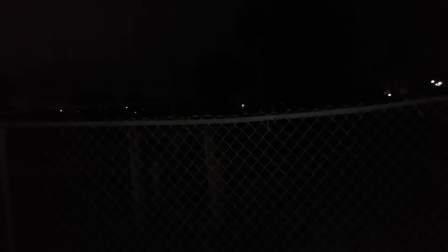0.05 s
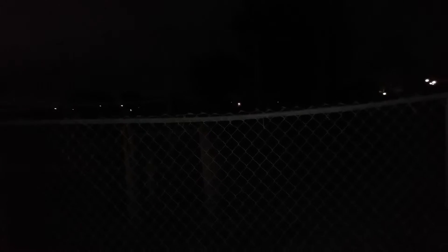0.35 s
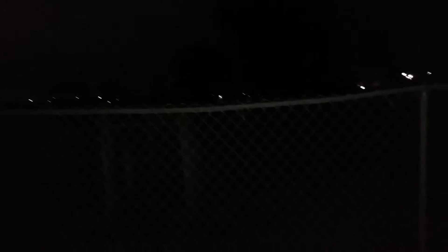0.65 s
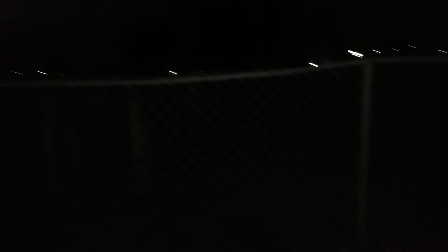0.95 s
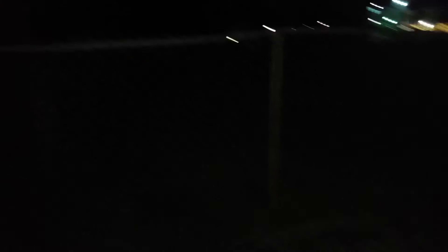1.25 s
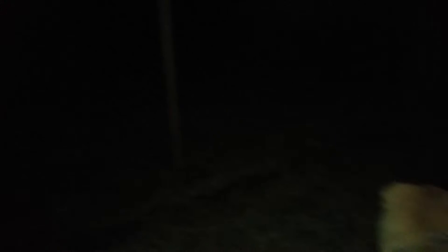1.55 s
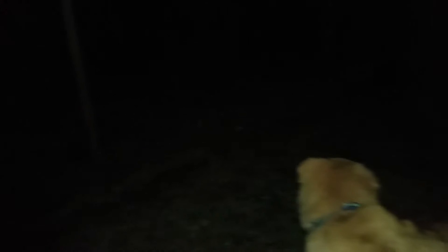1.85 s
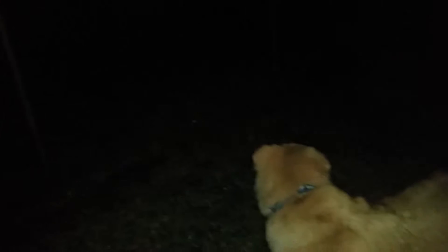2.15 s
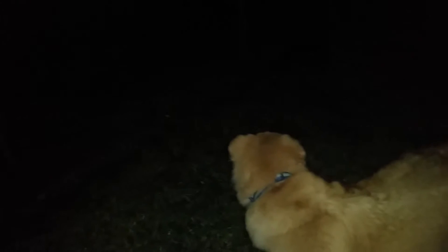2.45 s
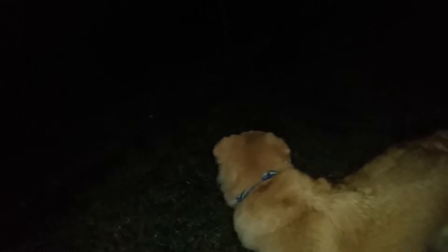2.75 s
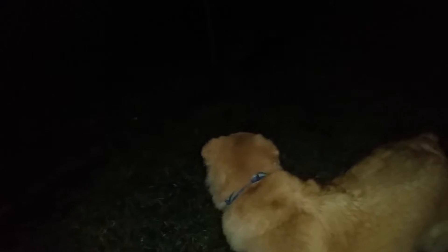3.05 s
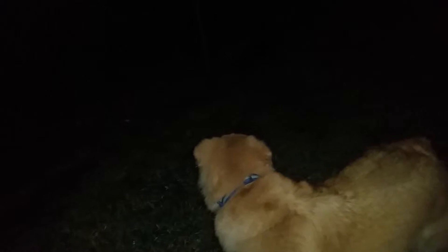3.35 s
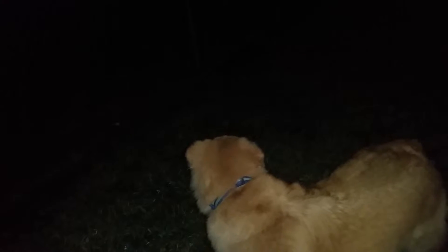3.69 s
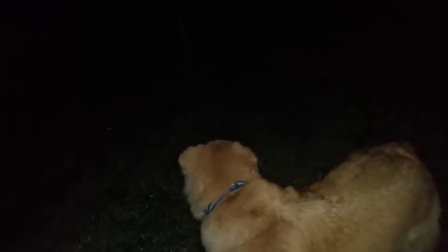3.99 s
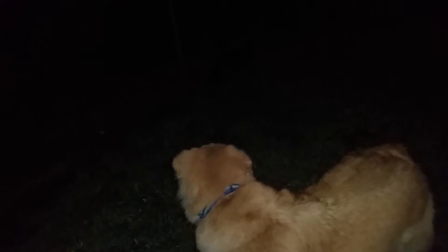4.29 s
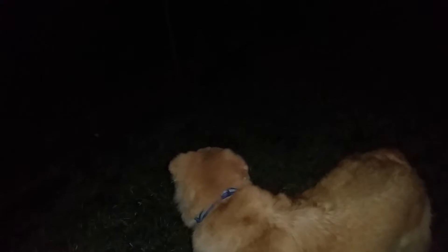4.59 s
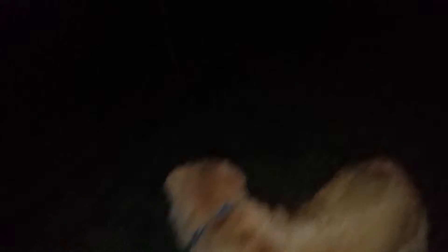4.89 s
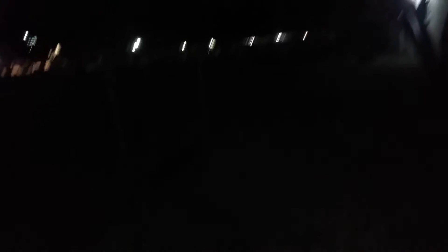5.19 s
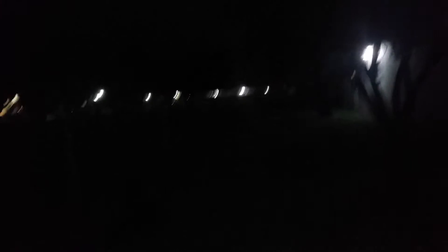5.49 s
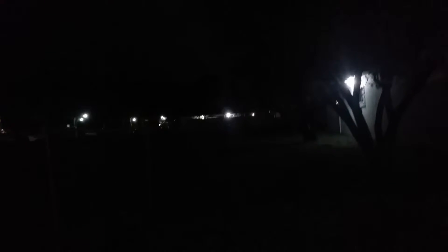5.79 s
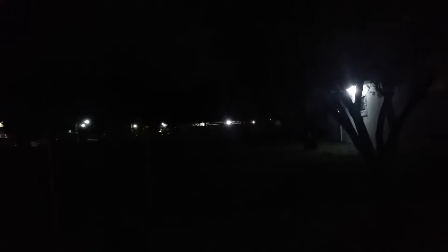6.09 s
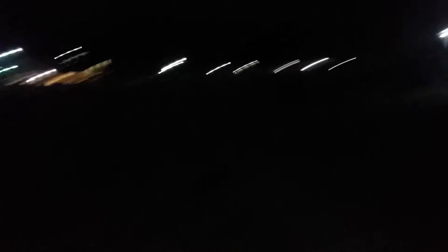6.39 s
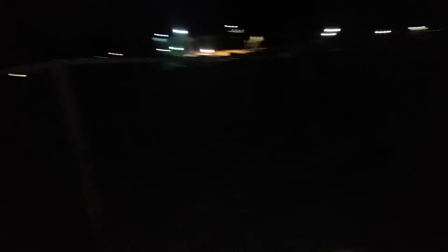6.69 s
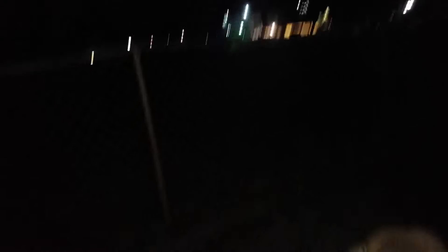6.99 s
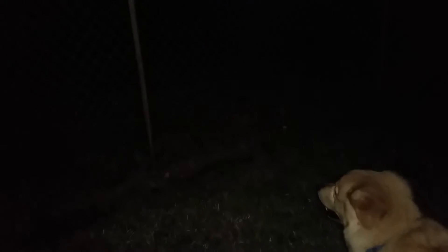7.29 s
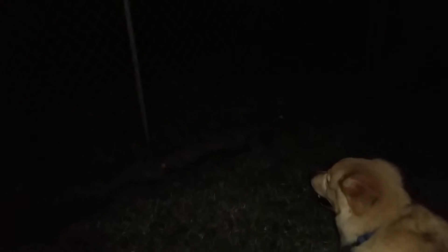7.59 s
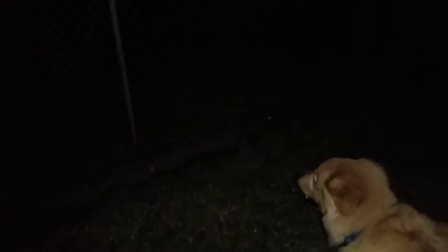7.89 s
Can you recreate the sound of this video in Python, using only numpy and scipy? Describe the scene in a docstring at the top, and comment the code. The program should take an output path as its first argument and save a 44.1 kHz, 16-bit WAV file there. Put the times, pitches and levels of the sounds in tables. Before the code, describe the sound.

In a yard at night, distant traffic makes a steady low rumble and a soft tyre roar. Two crickets chirp throughout, each at its own pace, above a faint chorus of others. A far engine passes early and another near the end. Past the middle, the traffic swells slightly and two small ticks sound close to the hand-held phone. A faint machine hum lies underneath.

```python
"""Two crickets chirping over a rumble of distant traffic: a yard at night, from a hand-held phone.
Each cricket scrapes its wings at its own pace, above a faint chorus of others. The traffic's tyre roar
is coloured by a bounce off the ground, and a narrow band of it near 700 Hz swells and fades.
Far engines come and go, a machine hums, and there are a few small ticks and squeaks."""
import sys
import numpy as np
from scipy import signal
from scipy.fft import rfft, irfft, next_fast_len
from scipy.io import wavfile
from scipy.ndimage import uniform_filter1d

SR = 44100
rng = np.random.default_rng(int(sys.argv[2]) if len(sys.argv) > 2 else 0)


def dump_mix(stems):
    """Bounce the given channels to the path in sys.argv[1] as a 16-bit WAV at rate SR."""
    frames = np.atleast_2d(stems).T  # one column per channel
    limited = np.clip(frames, -1, 1)  # hard clip at full scale
    pcm = np.round(limited * 32767).astype(np.int16)
    wavfile.write(sys.argv[1], SR, pcm)


N = 359228
TIME = np.arange(N) / SR
FREQ = np.maximum(np.arange(N // 2 + 1) * SR / N, 1)


def undb(db):
    """Decibels to gain."""
    return 10 ** (np.asarray(db) / 20)


def unit(x):
    """Scale to rms 1."""
    return x / np.sqrt(np.mean(x ** 2))


def curve(table, column):
    """One table column, linear in time between rows."""
    rows = np.array(table)
    return np.interp(TIME, rows[:, 0], rows[:, column])


def walk(rate_hz):
    """Smooth random signal, rms 1, rolling off at rate_hz."""
    size = next_fast_len(N, real=True)
    hz = np.arange(size // 2 + 1) * SR / size
    spectrum = rfft(rng.standard_normal(size)) * np.exp(-(hz / rate_hz) ** 2)
    return unit(irfft(spectrum, size)[:N])


def phase_of(hz):
    """Running phase [rad] of a changing frequency."""
    return 2 * np.pi * np.cumsum(hz) / SR


def stereo_noise(spectrum, correlation=0):
    """Coloured noise at the two microphones, rms 1."""
    hz, db = np.transpose(spectrum)
    gain = undb(np.interp(np.log(FREQ), np.log(hz), db))
    mid, side = rfft(rng.standard_normal((2, N))) * gain
    mid, side = mid * np.sqrt(1 + correlation), side * np.sqrt(1 - correlation)
    return unit(irfft(np.array([mid + side, mid - side]), N))


def pan(db):
    """Stereo gains for a left-minus-right level, single or per frequency."""
    return undb(np.vstack([db, -db]) / 2)


def fade(start_s, end_s, ramp_s):
    """Rise, hold, fall; half gain at start_s and end_s."""
    return np.clip(np.minimum(TIME - start_s, end_s - TIME) / ramp_s + .5, 0, 1)


def add(out, start_s, sound):
    """Mix a short sound in at start_s."""
    i = max(int(start_s * SR), 0)
    part = sound[..., :max(N - i, 0)]
    out[:, i:i + part.shape[-1]] += part


# machine lines: (frequency [Hz], relative level [dB])
HUM_LINES = [(118.6, -53), (319, -66), (930, -67), (1049, -75.5), (3005, -88), (3229, -82), (3539, -83.5),
             (3599, -105), (3659, -95), (4761, -86)]

def hum(gain_db, waver_db, drift_hz):
    """Thin lines of a far machine, wavering on the night air."""
    out = np.zeros((2, N))
    for hz, db in HUM_LINES:
        phase = phase_of(hz + drift_hz * walk(2.58))
        lead_rad = np.array([[min(hz / 1500, 1) * rng.standard_normal()], [0]])
        out += np.sqrt(2) * undb(db + gain_db + waver_db * walk(2.4)) * np.sin(phase + lead_rad)
    return out


# low hum tones: (start [s], end [s], frequency [Hz], level [dB])
HUM_SWELLS = [(3.8, 5.6, 316.3, -63.5), (3.854, 4.305, 117.9, -49.5), (4.968, 5.55, 119.6, -47.5),
              (5.895, 6.55, 232, -60)]

def hum_swells(fade_s, drift_hz):
    """Now and then a low line of the hum comes through more strongly."""
    out = np.zeros(N)
    for start_s, end_s, hz, db in HUM_SWELLS:
        phase = phase_of(hz + drift_hz * walk(4.33))
        out += np.sqrt(2) * undb(db) * fade(start_s, end_s, fade_s) * np.sin(phase)
    return out * pan(1.1)


# harmonics of two engines: (cycle multiple [-], relative level [dB])
CLIMBING_ORDERS = [(5, 0.5), (6, -1.5), (7, -1), (8, -3.5), (10, -7)]
CRUISING_ORDERS = [(5, 1.5), (7, -5), (9, -6), (10, -5.5)]

def engine(orders, span_s, glide_hz, gain_db, fade_s, waver_db, drift_hz):
    """A few multiples of the engine cycle carry this far; they glide together and waver apart."""
    cycle_hz = np.interp(TIME, span_s, glide_hz)
    out = np.zeros(N)
    for multiple, db in orders:
        phase = phase_of(multiple * cycle_hz + drift_hz * walk(4.21))
        out += np.sqrt(2) * undb(db + gain_db + waver_db * walk(2.8)) * np.sin(phase)
    return out * fade(*span_s, fade_s) * pan(1.4)


# traffic loudness: (time [s], relative rumble level [dB], relative roar level [dB])
TRAFFIC_LEVELS = [(0, -43, -52.5), (1.3, -43, -52), (1.7, -42, -50.5), (3.6, -44.5, -51.5),
                  (4.05, -43.5, -51.5), (4.8, -44, -51.5), (5.24, -42, -50.5), (5.75, -45, -52),
                  (7.1, -45, -50.5), (8.15, -42, -51)]
# engine and tyre noise: (frequency [Hz], relative density [dB])
RUMBLE_SPECTRUM = [(20, -23), (30, -33), (48, -6), (70, -3.5), (100, 2.5), (130, 0), (180, -4),
                   (240, -14.5), (320, -28.5), (600, -52.5)]
TYRE_SPECTRUM = [(100, -10), (250, -1), (400, 1), (500, -2), (620, 0.5), (780, 2), (920, -2), (1100, -7.5),
                 (1500, -9.5), (2200, -17.5), (3000, -23.5), (4200, -30.5), (7000, -49.5), (12000, -66)]
# likeness of left and right: (frequency [Hz], correlation [-])
MIC_CORRELATION = [(130, .965), (280, .88), (500, .68), (780, .55), (1000, .15), (1300, -.2), (2000, 0)]
# ground reflection as the phone moves: (time [s], first comb peak [Hz], gain [-])
GROUND_BOUNCE = [(0, 646, 0.056), (1.1, 616, 0.072), (1.9, 808.5, 0.35), (3, 728.5, 0.31), (5, 685.6, 0.33),
                 (5.8, 558.8, 0.35), (8.15, 852, 0.31)]

def traffic(grass_cutoff_hz, rumble_gain_db, roar_gain_db):
    """Engines and tyres all round; the ground returns a late copy of the roar, dulled by grass."""
    correlation = np.interp(FREQ, *np.transpose(MIC_CORRELATION))
    rumble = stereo_noise(RUMBLE_SPECTRUM, correlation) * pan(2.1)
    rumble *= undb(curve(TRAFFIC_LEVELS, 1) + rumble_gain_db)
    # the phone's body shades the left microphone in the upper mids
    shade_db = np.interp(FREQ, [400, 800, 1300, 2400, 5000], [2.5, 0, -1.9, -3.5, -2])
    tyre_spectrum = rfft(stereo_noise(TYRE_SPECTRUM, correlation)) * pan(shade_db)
    direct = irfft(tyre_spectrum, N)
    dulled = irfft(tyre_spectrum / np.sqrt(1 + (FREQ / grass_cutoff_hz) ** 2), N)
    delay_s = 1 / curve(GROUND_BOUNCE, 1)
    bounced = np.array([np.interp(TIME - delay_s, TIME, channel) for channel in dulled])
    roar = unit(direct + curve(GROUND_BOUNCE, 2) * bounced)
    return rumble + roar * undb(curve(TRAFFIC_LEVELS, 2) + roar_gain_db)


def roar_band(nominal_hz, width_hz, bounce_follow, peak_s, span_s, peak_db):
    """A narrow band of traffic roar swells and fades, partly following the ground bounce's pitch."""
    centre_hz = nominal_hz * (curve(GROUND_BOUNCE, 1) / nominal_hz) ** bounce_follow
    phase = phase_of(centre_hz)
    band = walk(width_hz) * np.sin(phase) + walk(width_hz) * np.cos(phase)
    swell = 1 / np.hypot(1, (TIME - peak_s) / span_s)
    return unit(band) * undb(peak_db) * swell


# upper traffic band: (frequency [Hz], relative density [dB])
BRIGHT_SPECTRUM = [(1700, -31), (2000, -4), (2220, -3), (2480, -10), (2760, -13), (3200, -19), (5000, -30)]

def bright_traffic(facing_s, span_s, away_db, rise_db):
    """A brighter traffic hiss rises and falls as the phone turns to the house and back."""
    facing = np.exp(-((TIME - facing_s) / span_s) ** 2)
    return stereo_noise(BRIGHT_SPECTRUM) * undb(away_db + rise_db * facing) * pan(-1.1)


# snaps: (time [s], relative level [dB], low edge [Hz], high edge [Hz], decay [s])
TICKS = [(2.197, -70, 6000, 12000, .005), (3.124, -61, 4500, 7500, .0015), (4.89, -66, 3000, 5500, .01),
         (5.634, -38, 900, 2700, 0.00077), (5.73, -45.5, 800, 2700, .0008), (6.62, -64, 3580, 5500, .005)]

def ticks(gain_db):
    """Tiny dry snaps and rustles close by: decaying bursts of band noise."""
    out = np.zeros((2, N))
    t = np.arange(SR // 15) / SR
    for start_s, db, low_hz, high_hz, decay_s in TICKS:
        snap = rng.standard_normal((2, len(t))) * np.exp(-t / decay_s)
        band = signal.butter(2, [low_hz, high_hz], "band", fs=SR, output="sos")
        add(out, start_s, 2 * undb(db + gain_db) * signal.sosfilt(band, snap))
    return out


# high peeps: (centre time [s], pitch [Hz], length [s], level [dB], pitch waver [Hz])
SQUEAKS = [(5.056, 3900, 0.08, -75, 202), (6.318, 2820, 0.025, -66, 132), (6.366, 2770, 0.017, -63.5, 130)]

def squeaks():
    """Brief, thin tones of unsteady pitch."""
    out = np.zeros((2, N))
    for centre_s, hz, length_s, db, waver_hz in SQUEAKS:
        phase = phase_of(hz + waver_hz * walk(301))
        envelope = np.exp(-(2 * (TIME - centre_s) / length_s) ** 2)
        out += np.sqrt(2) * undb(db) * envelope * np.sin(phase)
    return out


# massed crickets: (frequency [Hz], relative density [dB])
CHORUS_SPECTRUM = [(5300, -48), (5650, -14), (5850, 0), (6020, 2), (6180, -4), (6350, -13.5), (6900, -18),
                   (7500, -15), (8300, -32)]

def chorus(level_db, throb_db):
    """Many far crickets blur into a throbbing band around their common pitch."""
    throb = np.array([walk(28), walk(28)])
    return undb(level_db + throb_db * throb) * stereo_noise(CHORUS_SPECTRUM) * pan(3)


def yard_reverb(x, t60_s, wet_db):
    """Fence, grass and walls scatter a weak, short tail."""
    t = np.arange(SR // 2) / SR
    tail = rng.standard_normal((2, len(t))) * undb(-60 * t / t60_s) * (t > .004)
    tail /= np.sqrt(np.sum(tail ** 2, axis=1, keepdims=True))
    return x + undb(wet_db) * signal.fftconvolve(x, tail, axes=1)[:, :N]


# phone turning: (time [s], near cricket L-R [dB], far cricket L-R [dB], left phase lead [rad])
HEADING = [(0, 9, 7, 1), (1.0, 2, 6.5, 2.5), (2.3, 1, 2, 0.5), (3.2, -5, 1, 1.04), (4.4, -1, 6, 1.77),
           (5.5, 5, -1.5, 3), (6.4, -2.5, 0, 3), (7.4, 1, 3, 0.6), (8.15, -3, 7, 2)]
# chirps: (first syllable centre [s], syllables [count], relative level [dB])
NEAR_CHIRPS = [(0.043, 2, -65), (0.418, 2, -62.5), (0.814, 2, -63), (1.309, 2, -64), (1.721, 3, -58.5),
               (2.166, 2, -59.5), (2.541, 3, -56.5), (2.951, 3, -57.5), (3.399, 3, -56.5), (3.796, 3, -57),
               (4.241, 2, -57), (4.652, 3, -57), (5.251, 3, -56), (5.814, 3, -52.5), (6.378, 3, -57.5),
               (6.755, 2, -56), (7.07, 2, -56), (7.434, 3, -58.5), (8.078, 2, -56.5)]
FAR_CHIRPS = [(0.106, 2, -61.5), (0.44, 3, -63), (0.862, 3, -61), (1.313, 3, -62.5), (1.765, 3, -70),
              (2.228, 2, -61), (2.57, 3, -60.5), (3.069, 2, -60.5), (3.405, 3, -61), (3.924, 2, -61),
              (4.325, 2, -64), (4.895, 3, -59), (5.487, 3, -57), (6.06, 3, -60), (6.682, 2, -54.5),
              (7.063, 3, -68), (7.739, 3, -64)]

def cricket(chirps, balance_db, hz, period_s, syllable_s, glide_hz, shake_hz, rasp, gain_db):
    """Each wing closure drags the scraper over the file: a nearly pure, slightly rising syllable."""
    out = np.zeros((2, N))
    stroke = np.arange(int(syllable_s * SR)) / SR / syllable_s
    ramp = np.minimum(1, np.minimum(stroke / 0.14, (1 - stroke) / 0.28))
    envelope = np.sin(ramp * np.pi / 2) ** 2
    leads_rad = curve(HEADING, 3)
    for time_s, count, db in chirps:
        pan_db = np.interp(time_s, TIME, balance_db)
        lead_rad = np.interp(time_s, TIME, leads_rad)
        for k in range(count):
            force, detune, late, sway, lean = rng.standard_normal(5)
            # uneven teeth shake pitch and level
            teeth = rng.standard_normal((2, len(stroke)))
            shake, flutter = (unit(uniform_filter1d(row, size=90)) for row in teeth)
            pitch_hz = hz + 4 * detune + glide_hz * (stroke - .5) + shake_hz * shake
            phase = phase_of(pitch_hz) + 2 * np.pi * rng.random()
            amplitude = undb(db + gain_db + 0.32 * force) * envelope * (1 + rasp * flutter)
            # short wavelength: hand sway shifts phase and balance
            shift_rad = np.array([[lead_rad + 0.41 * sway], [0]])
            syllable = np.sqrt(2) * amplitude * np.sin(phase + shift_rad) * pan(pan_db + 1.1 * lean)
            add(out, time_s + k * period_s - syllable_s / 2 + .0004 * late, syllable)
    return out


def scene():
    """Two crickets in front of the night's background."""
    near = cricket(NEAR_CHIRPS, curve(HEADING, 1), hz=6053, period_s=.0585, syllable_s=.032,
                   glide_hz=41.5, shake_hz=13, rasp=0.11, gain_db=0.3)
    far = cricket(FAR_CHIRPS, curve(HEADING, 2), hz=5990, period_s=.06, syllable_s=.034,
                  glide_hz=20, shake_hz=17, rasp=0.049, gain_db=-1.8)
    crickets = yard_reverb(near + far, t60_s=0.27, wet_db=-14) + chorus(level_db=-71.5, throb_db=1.5)
    road = traffic(grass_cutoff_hz=1600, rumble_gain_db=-0.5, roar_gain_db=1.44)
    road += roar_band(nominal_hz=702, width_hz=107, bounce_follow=.35,
                      peak_s=5.8, span_s=1.22, peak_db=-53.5)
    road += bright_traffic(facing_s=5.9, span_s=1, away_db=-78, rise_db=10.5)
    road += engine(CLIMBING_ORDERS, span_s=(1.3, 3.15), glide_hz=(21.58, 23.8),
                   gain_db=-49.5, fade_s=0.51, waver_db=2, drift_hz=1.18)
    road += engine(CRUISING_ORDERS, span_s=(6.35, 8.4), glide_hz=(20.05, 19.8),
                   gain_db=-49.5, fade_s=.4, waver_db=0, drift_hz=1.143)
    machine = hum(gain_db=-5.5, waver_db=0.5, drift_hz=1.147) + hum_swells(fade_s=0.11, drift_hz=1.116)
    return machine + road + ticks(gain_db=5) + squeaks() + crickets


# microphone self-noise: (frequency [Hz], relative density [dB])
HISS_SPECTRUM = [(2500, -1), (4500, 3.5), (7000, 9.5), (8400, -10), (9600, 2), (14500, 0)]

def record(dry):
    """The microphones add hiss, the left a little brighter; the top is cut at 14.5 kHz."""
    tilt_db = np.interp(FREQ, [5000, 8000, 11500], [1, 5, 1.9])
    hiss_db = -73.5 + 0.31 * walk(9)
    hiss = undb(hiss_db) * irfft(rfft(stereo_noise(HISS_SPECTRUM)) * pan(tilt_db), N)
    edge_fade = np.minimum(1, np.minimum(TIME, TIME[-1] - TIME) / .003)
    lowpass = signal.ellip(10, .2, 70, 14500, fs=SR, output="sos")
    return signal.sosfilt(lowpass, (dry + hiss) * edge_fade)


dry = scene()
out = record(dry)
dump_mix(out)
```